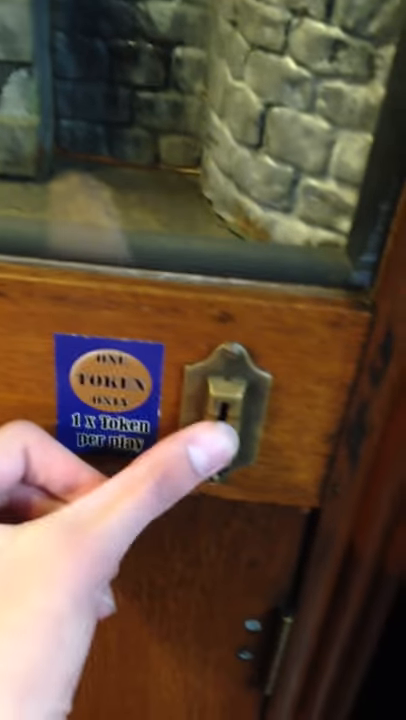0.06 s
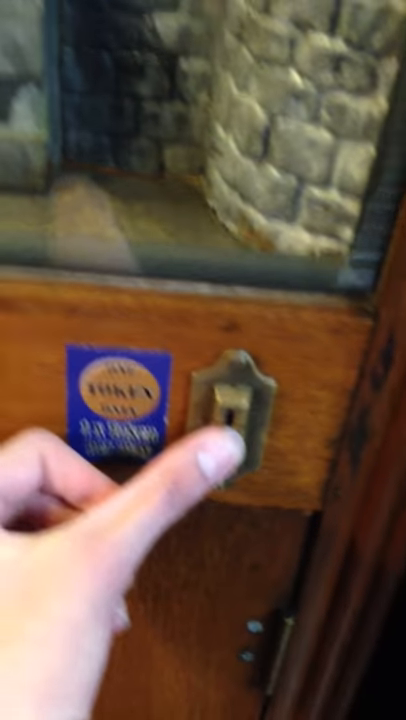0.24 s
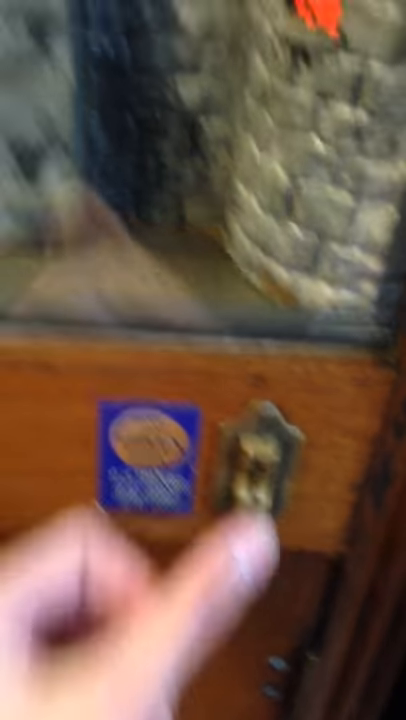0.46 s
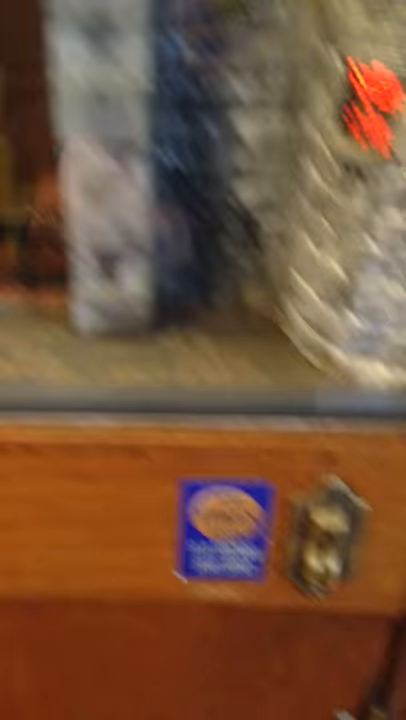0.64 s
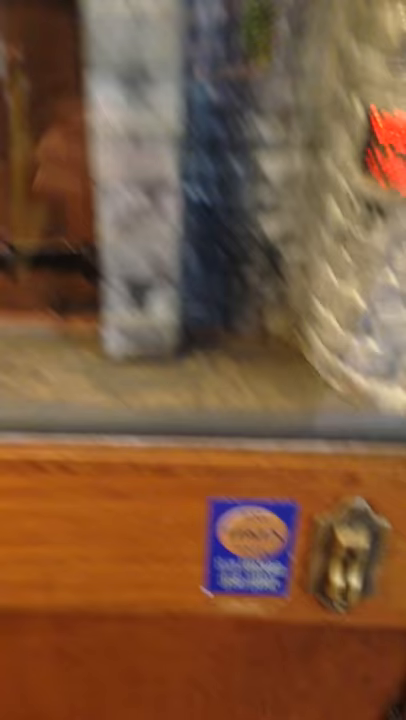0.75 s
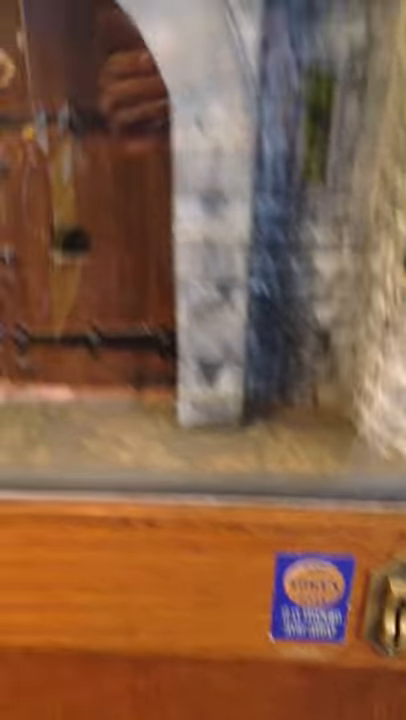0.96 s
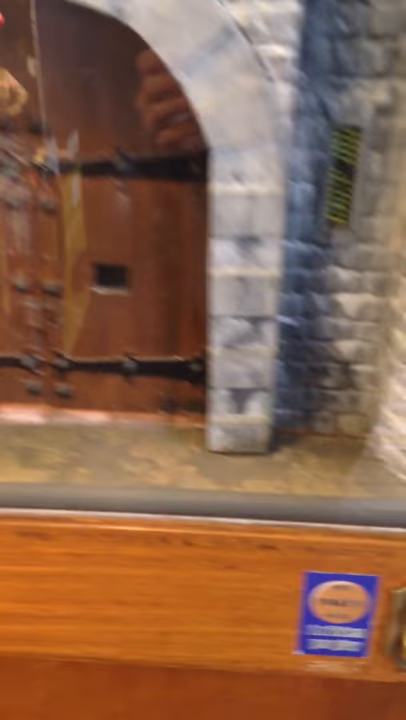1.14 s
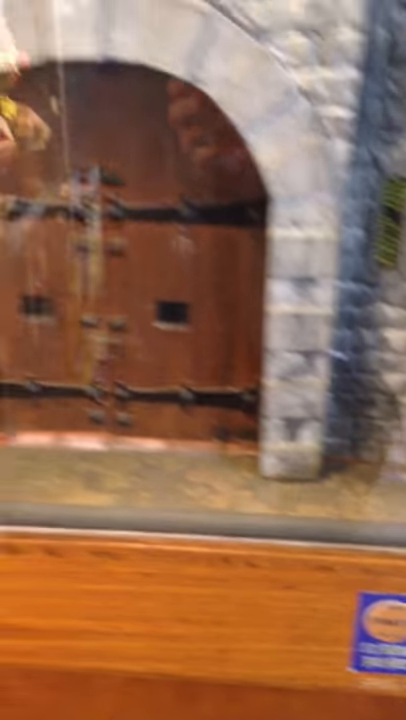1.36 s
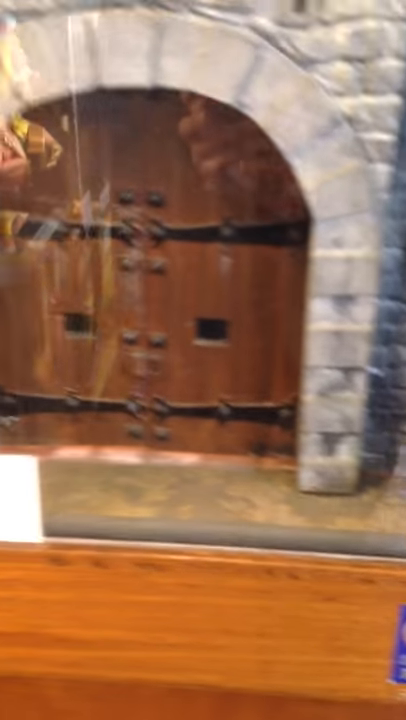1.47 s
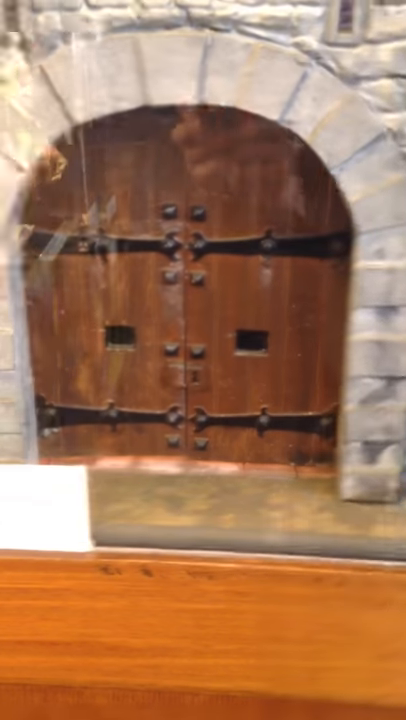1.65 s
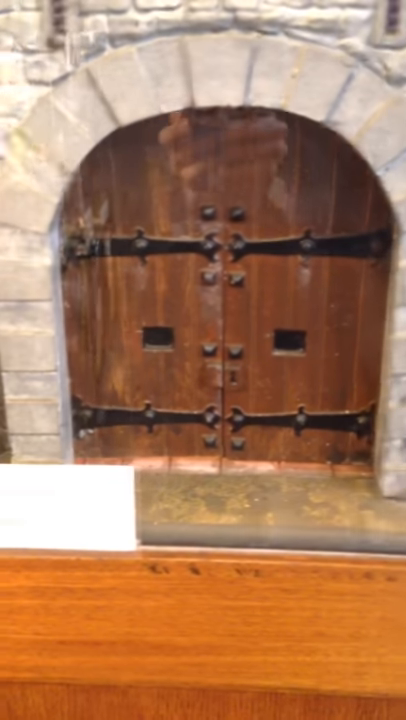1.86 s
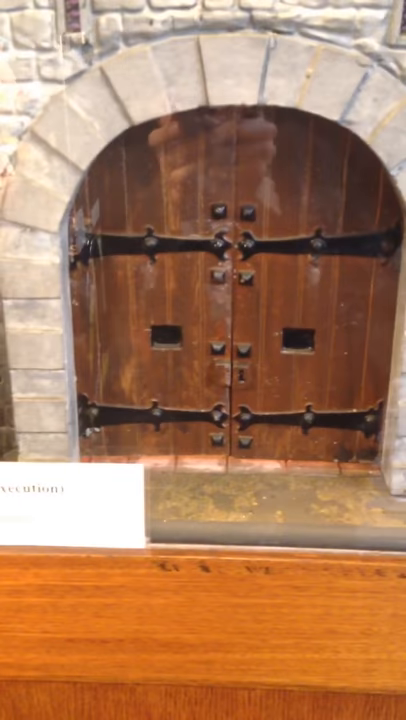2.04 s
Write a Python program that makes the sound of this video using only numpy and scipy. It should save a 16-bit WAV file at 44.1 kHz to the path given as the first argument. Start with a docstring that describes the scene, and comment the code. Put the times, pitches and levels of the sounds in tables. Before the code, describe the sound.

Close up indoors, quick metallic clicks of a token in a slot end in a loud clunk; an electric hum jumps in, a little motor spins up with faint gear whines, cloth rustles softly and a relay ticks.

```python
"""Over faint room tone, a metal token rattles and scrapes down the chute of a wooden coin-operated cabinet.
Soft knocks thud beneath; the token trips the latch and lands with a clunk. Hits are decaying modes and noise.
Mains hum, a wavering tone with overtones, lurches in; a small motor runs up, with gear whines and whir.
Clothing, as coloured noise, rustles near the microphone; a relay ticks once; a gear rasp fades in."""
import sys
import numpy as np
from scipy import signal
from scipy.io import wavfile
from scipy.ndimage import uniform_filter1d

SR = 44100
rng = np.random.default_rng(int(sys.argv[2]) if len(sys.argv) > 2 else 0)


def wav_out(sig):
    """Save sig, one row per channel (or a flat mono array), as 16-bit PCM at SR to the path in sys.argv[1]."""
    wavfile.write(sys.argv[1], SR, np.round(np.clip(np.atleast_2d(sig).T, -1, 1) * 32767).astype(np.int16))


def field_ratio(decibels):
    """Amplitude ratio for a level in dB (20 dB per decade); scalars and array-likes work."""
    return 10 ** (np.asarray(decibels, dtype=float) / 20)


N = 92610
T = np.arange(N) / SR

# whir spectrum: freq_hz, density_db (dB per Hz, relative)
WHIR_COLOUR = [(25, -1), (50, -33), (75, 9), (110, -5), (160, -1.5), (250, -10), (400, -7), (600, -11),
               (750, -3), (900, -10), (1200, -9.5), (2000, -17), (4000, -24.5), (8000, -30.5), (15500, -48)]
# token strikes on the chute: start_s, level_db, struck_mode_hz, lower_tone_db, upper_tone_db, rattle_decay_s
TOKEN_TAPS = [(.0005, -38, 4440, -57, -41, 0.0032), (.007, -25.5, 7600, -39, -46, 0.0028),
              (0.055, -23, 1500, -65, -64.5, 0.003), (0.072, -37.5, 3330, -73, -57, 0.011),
              (0.1225, -32, 3430, -39.5, -51.5, 0.0054), (0.1317, -22.5, 3410, -41.5, -55, 0.003),
              (0.144, -26, 1500, -49, -66, 0.0073), (0.1615, -28, 7600, -58, -61, 0.004),
              (.165, -25, 3430, -52.5, -64, 0.0039), (0.171, -31, 3410, -30.5, -70, 0.0088),
              (0.181, -32, 4400, -42, -70, 0.011), (0.185, -21, 1500, -72, -70, 0.005),
              (0.1962, -21.5, 4230, -54, -60, 0.012), (0.204, -30, 11260, -79, -57, 0.015),
              (0.219, -41.5, 5830, -65, -56, .008), (0.247, -31, 14660, -55, -60, 0.003),
              (0.267, -60, 3410, -35.5, -75, 0.063), (0.318, -65, 3410, -67, -80, .01)]
# token tones: freq_hz, t60_s
TOKEN_TONES = [(9895, 0.13), (12610, 0.26)]
# chute wall modes: freq_hz, level_db, t60_s
CHUTE_MODES = [(1500, -3, 0.028), (3410, 3, 0.016), (4400, 3, 0.016), (5830, -10, .015), (7600, -2, 0.015),
               (11260, -10, 0.01), (15000, -8, 0.01)]
# contact scratch spectrum: freq_hz, density_db (dB per Hz, relative)
SCRATCH_COLOUR = [(180, -43), (300, -9), (1120, -6.5), (2790, -8.5), (4300, -7.5), (6520, -9.5),
                  (14700, -3.5), (16000, -29)]
# token scraping along the chute: time_s, level_db
SLIDE_LEVEL = [(0, -32), (.03, -39.5), (.06, -42.5), (.1, -46), (.118, -51), (.13, -40.5), (.16, -40),
               (.19, -52), (.21, -41), (.23, -40), (.26, -67)]
# soft knocks on the cabinet: start_s, level_db
SOFT_KNOCKS = [(.001, -35.5), (.012, -38), (0.026, -46), (.055, -45), (.08, -46.5), (0.126, -49.5),
               (.16, -51), (0.201, -35), (.778, -48.5), (.8, -43), (0.841, -52)]
# blows on the cabinet: start_s, level_db, brightness_db_per_octave
CABINET_BLOWS = [(.198, -29.5, 0), (0.2309, -13, 5), (.2345, -29.5, 9.5), (.238, -19, 0), (.244, -26, -2),
                 (0.25, -25, -7.5), (.2575, -19, 5.5), (.265, -33, -9.5), (.276, -27.5, -6.5),
                 (.284, -45, -4.5), (0.296, -32.5, -6), (.313, -35, -4.5)]
# wooden panel modes: freq_hz, level_db, t60_s
PANEL_MODES = [(151.5, -12, 0.13), (285, -11, 0.1), (490, -5, 0.15), (640, -4, 0.1), (754, -6, 0.2),
               (802, -9, 0.2), (996, -5, 0.1), (1176, 0, 0.063), (1474, -1, 0.035), (1664, -4, 0.04),
               (1842, -7, 0.04), (1972, -5, 0.04), (2078, -4, 0.05), (2130, -6, .06), (2710, -4, 0.03),
               (3300, -4, 0.035)]
# crack spectrum: freq_hz, density_db (dB per Hz, relative)
CRACK_COLOUR = [(150, -36), (250, -17), (500, -7), (700, -4), (1250, -6), (1750, -5), (2090, 0),
                (2600, -10), (3370, -9), (4200, -20), (6500, -21), (9000, -31), (15000, -42)]
# room decay: freq_hz, t60_s
ROOM_DECAY = [(100, 0.83), (400, 1), (1000, 0.48), (2100, 0.76), (3500, 0.56), (5000, 0.44), (8000, 0.39),
              (14000, 0.29)]
# hum fundamental: time_s, level_db
HUM_LEVEL = [(.2, -67), (.23, -45), (.255, -37.5), (.275, -34), (.298, -50), (.325, -40), (0.346, -33.5),
             (.37, -40.5), (.41, -41.5), (0.598, -44), (.8, -44), (1.2, -46), (1.7, -45), (2.1, -44.5)]
# hum overtones: multiple, level_db (once running)
OVERTONES = [(2, -57.5), (3, -60), (5, -67), (7, -67)]
# motor tones: time_s, level_db
MOTOR_LEVEL = [(.3, -70), (.62, -66), (.74, -55), (1.2, -56.5), (2.1, -56)]
# shaft orders: multiple_of_shaft, level_db, waver_db
SHAFT_ORDERS = [(9.87, -10, 2.5), (12, 0, 1.2), (13, -5, 2), (14, -10, 4), (15, -10, 4), (16, -12, 4)]
# gear whines: start_s, end_s, first_hz, last_hz, level_db
GEAR_WHINES = [(.33, .58, 385, 430, -61), (.38, .87, 695, 705, -58), (.45, .72, 610, 660, -61),
               (1.05, 1.25, 715, 725, -60), (1.15, 1.52, 760, 800, -62), (1.62, 2.2, 1030, 1034, -62),
               (1.85, 2.2, 1200, 1203, -68)]
# rustle: time_s, level_db
RUSTLE_LEVEL = [(.35, -85), (.47, -72), (.56, -63), (0.66, -57), (0.745, -58.5), (.8, -63), (.95, -65),
                (1.1, -69), (1.28, -75), (1.47, -68), (1.56, -75), (1.82, -70), (2.1, -77)]
# cloth spectrum: freq_hz, density_db (dB per Hz, relative)
CLOTH_COLOUR = [(1470, -39), (2500, 4), (2850, 8.5), (14200, 9.5), (15600, 4), (16000, -35)]
# gear rasp spectrum: freq_hz, density_db (dB per Hz, relative)
RASP_COLOUR = [(800, -30), (1050, 12), (1300, 4), (1500, -15), (1750, 4), (2100, -18), (3200, -7),
               (4500, -37)]

MOTOR_ON_S, SPIN_UP_S = 0.3, 0.15


def unit_rms(x):
    """Scales to rms 1."""
    return x / np.sqrt(np.mean(x ** 2) + 1e-20)


def read(points, hz):
    """Reads a table on a log-frequency axis."""
    f, value = np.transpose(points)
    return np.interp(np.log(hz + 1), np.log(f + 1), value)


def add(mix, start_s, sound):
    """Mixes a sound in at start_s."""
    part = mix[max(round(start_s * SR), 0):][:len(sound)]
    part += sound[:len(part)]


def butter(x, order, hz, kind="low"):
    """Butterworth filter."""
    return signal.sosfilt(signal.butter(order, hz, kind, fs=SR, output="sos"), x)


def noise(colour, patchy_db):
    """Coloured noise with drifting patches, rms 1."""
    hz = np.fft.rfftfreq(1024, 1 / SR)
    real, imag, patches = rng.standard_normal((N // 256 + 5, 513, 3)).T
    patches = uniform_filter1d(patches, 10, axis=0)
    patches = unit_rms(uniform_filter1d(patches, 10, axis=1))
    z = (real + 1j * imag) * field_ratio(read(colour, hz)[:, None] + patchy_db * patches)
    return unit_rms(signal.istft(z, nperseg=1024, noverlap=768)[1][:N])


def wander(fastest_hz, slowest_hz=0.5):
    """Slow chance, rms 1: sines of random phase, weaker with frequency."""
    rates_hz = np.geomspace(slowest_hz, fastest_hz, num=20)
    return unit_rms(sum(np.sin(2 * np.pi * (f * T + rng.random())) / np.sqrt(f) for f in rates_hz))


def ring(modes, tilt_db_per_octave, scatter_db, rise_s):
    """One blow into a set of decaying modes, each struck with a different share."""
    t = T[:SR // 3, None]
    hz, db, t60_s = np.transpose(modes)
    luck = rng.standard_normal((len(modes), 2))
    tilt_db = tilt_db_per_octave * np.log2(hz / 1000)
    level = field_ratio(db + tilt_db + scatter_db * luck[:, 0] - 60 * t / t60_s)
    tones = level * np.sin(2 * np.pi * hz * t + luck[:, 1])
    return tones.sum(1) * (1 - np.exp(-t[:, 0] / rise_s))


def switched_on():
    """Ramp from 0 to 1 as the motor is switched on."""
    return np.clip((T - MOTOR_ON_S) / SPIN_UP_S, 0, 1)


def shaft_turn():
    """Shaft angle in radians: from switch-on, speed closes exponentially on full speed."""
    full_per_s, lag_per_s, run_up_s = 47.62, 7, 0.3
    speed = full_per_s - lag_per_s * np.exp(-np.maximum(T - MOTOR_ON_S, 0) / run_up_s)
    return 2 * np.pi * np.cumsum(speed * (1 + 0.0016 * wander(11.8))) / SR


def whir(turn):
    """Coloured noise: room tone before the switch, then louder under strain, throbbing once a turn."""
    running_db, idle_db, strain_db, strain_s, throb_depth = -54, -3, 4, 0.59, 0.18
    on = switched_on()
    labour_db = strain_db * on * np.exp(-((T - MOTOR_ON_S) / strain_s) ** 2)
    level_db = running_db + idle_db * (1 - on) + labour_db + 1.37 * wander(8.78)
    throb = 1 + throb_depth * on * np.cos(turn)
    return field_ratio(level_db) * throb * noise(WHIR_COLOUR, patchy_db=-0.67)


def slide(scratch):
    """The token scrapes along the chute: dull noise of fluttering level."""
    time_s, db = np.transpose(SLIDE_LEVEL)
    level = field_ratio(np.interp(T, time_s, db, right=-99) + 2.2 * wander(151, 14.7))
    return level * butter(scratch[::-1], 2, 5150)


def token():
    """Each tap is a scratchy rattle that rings the chute, and the token until a new touch stifles it."""
    scratch_db, top_hz, dull_ratio = -6, 15700, 2.4
    focus_db_per_octave, stifle_s = -8, 0.0058
    twin_hz, twin_db = 65, -10
    out, t = np.zeros(N), T[:SR // 3]
    scratch = noise(SCRATCH_COLOUR, patchy_db=1.5)
    for tap, after in zip(TOKEN_TAPS, TOKEN_TAPS[1:] + [[N / SR]]):
        start_s, level_db, struck_hz, *tones_db, decay_s = tap
        rattle = np.roll(scratch, -round(start_s * SR))[:len(t)]
        rattle = butter(rattle, 2, min(dull_ratio * struck_hz, top_hz))
        rattle = rattle * np.minimum(t / 0.0015, 1) * np.exp(-t / decay_s)
        # modes far from the struck one ring less
        walls = [(hz, db + focus_db_per_octave * abs(np.log2(hz / struck_hz)), t60_s)
                 for hz, db, t60_s in CHUTE_MODES]
        chute = 0.55 * ring(walls, 0, scatter_db=2, rise_s=0.002)
        modes = [(hz, db, t60_s) for (hz, t60_s), db in zip(TOKEN_TONES, tones_db)]
        # a weaker twin just above each tone makes the ring flutter
        modes += [(hz + twin_hz, db + twin_db, t60_s) for hz, db, t60_s in modes]
        free = np.exp(-np.maximum(t + start_s - after[0], 0) / stifle_s)
        tones = free * ring(modes, 0, scatter_db=3.0, rise_s=decay_s / 3)
        add(out, start_s, field_ratio(level_db) * (field_ratio(scratch_db) * rattle + chute) + tones)
    return out + slide(scratch)


def knocks():
    """Soft contacts shorten the ring and reach only the lowest panel modes."""
    out, t60_ratio = np.zeros(N), 0.55
    modes = np.multiply(PANEL_MODES[:4], [1, 1, t60_ratio])
    for start_s, level_db in SOFT_KNOCKS:
        add(out, start_s, field_ratio(level_db) * ring(modes, -5, scatter_db=2.5, rise_s=0.003))
    return out


def room(x):
    """Sparse taps of random sign, each band dying at its own speed."""
    taps = np.zeros(SR)
    at = np.arange(300, SR - 20, 20)
    taps[at + rng.integers(0, 20, len(at))] = rng.choice([-1., 1.], len(at))
    hz, t, z = signal.stft(taps, SR, nperseg=256)
    decay = field_ratio(-60 * t / read(ROOM_DECAY, hz)[:, None])
    tail = signal.istft(z * decay, SR, nperseg=256)[1]
    return signal.fftconvolve(x, tail / np.linalg.norm(tail))[:N]


def blows():
    """Each blow cracks and rings the wooden panels; the crack's treble dies first."""
    body_hz, snap_hz, crack_t60_s, snap_t60_s = 950, 4000, 0.046, 0.022
    out, t = np.zeros(N), T[:SR // 3]
    crack = noise(CRACK_COLOUR, patchy_db=2)
    snap = butter(crack, 2, snap_hz, "high")
    body = butter(crack, 2, body_hz)
    bands = body, crack - snap - body, snap
    for start_s, level_db, tilt_db in CABINET_BLOWS:
        low, mid, high = (np.roll(x, -round(start_s * SR))[:len(t)] for x in bands)
        # bright blows hold less body and more snap
        burst = (low * field_ratio(-1.2 * tilt_db) + mid) * field_ratio(-60 * t / crack_t60_s)
        burst = burst + high * field_ratio(1.9 * tilt_db - 3 - 60 * t / snap_t60_s)
        burst = burst * np.minimum(t / 0.0005, 1)
        panels = 0.22 * ring(PANEL_MODES, tilt_db, scatter_db=2, rise_s=0.0008)
        add(out, start_s, field_ratio(level_db) * (burst + panels))
    return out


def hum():
    """Mains hum of the coil lurches at switch-on; its overtones come in as the motor takes load."""
    time_s, db = np.transpose(HUM_LEVEL)
    phase = 2 * np.pi * np.cumsum(100.3 + 0.25 * wander(8)) / SR
    overtones = sum(field_ratio(level_db + 2.5 * wander(20, 2)) * np.sin(k * phase + k) for k, level_db in OVERTONES)
    fundamental = field_ratio(np.interp(T, time_s, db, left=-90)) * np.sin(phase)
    return np.sqrt(2) * (fundamental + switched_on() * overtones)


def motor(turn):
    """Tones at multiples of the shaft speed climb with it, each wavering in level."""
    time_s, db = np.transpose(MOTOR_LEVEL)
    orders = sum(field_ratio(level_db + waver_db * wander(40, 4)) * np.sin(k * turn + 6 * rng.random())
                 for k, level_db, waver_db in SHAFT_ORDERS)
    return np.sqrt(2) * switched_on() * field_ratio(np.interp(T, time_s, db)) * orders


def gear_whines():
    """Gears whine as they engage: gliding tones, unsteady in pitch and level."""
    out = np.zeros(N)
    for start_s, end_s, first_hz, last_hz, level_db in GEAR_WHINES:
        hz = np.interp(T, [start_s, end_s], [first_hz, last_hz])
        gate = np.clip(np.minimum(T - start_s, end_s - T) / 0.051, 0, 1)
        level = np.sqrt(2) * gate * field_ratio(level_db + 3 * wander(40, 4))
        out += level * np.sin(2 * np.pi * np.cumsum(hz + 9 * wander(40, 3)) / SR)
    return out


def rustle():
    """Cloth and skin hiss as the hand draws back: coloured noise."""
    time_s, db = np.transpose(RUSTLE_LEVEL)
    level = field_ratio(np.interp(T, time_s, db, left=-90) + 0.7 * wander(40))
    return level * noise(CLOTH_COLOUR, patchy_db=2)


def relay_tick():
    """A relay ticks: one dry snap of decaying band-passed noise."""
    start_s, level_db, t60_s, band_hz = 0.7743, -41, 0.016, (1200, 5500)
    out, t = np.zeros(N), T[:SR // 20]
    snap = butter(rng.standard_normal(len(t)), 2, band_hz, "band")
    add(out, start_s, field_ratio(level_db - 60 * t / t60_s) * unit_rms(snap))
    return out


def gear_rasp():
    """Gear rasp: coloured noise fading in."""
    level_db, fade_s = -62, (0.78, 1.78)
    return field_ratio(level_db) * np.interp(T, fade_s, [0, 1]) * noise(RASP_COLOUR, patchy_db=2.5)


def scene():
    """Token, cabinet and tick in the room, over the running mechanism and the rustle."""
    room_db = -13.5
    turn = shaft_turn()
    hits = token() + knocks() + blows() + relay_tick()
    mechanism = whir(turn) + hum() + motor(turn) + gear_whines() + gear_rasp()
    return (hits + field_ratio(room_db) * room(hits) + mechanism + rustle())[None]


def roll_off(x):
    """The treble ends steeply here."""
    return signal.sosfilt(signal.butter(12, 16370, fs=SR, output="sos"), x)


def record(dry):
    """The microphone's low cut, then the band limit."""
    low_cut_hz, edge_hz = 45, 15700
    mix = butter(dry, 3, low_cut_hz, "high")
    band_limit = signal.firwin(511, edge_hz, window=("kaiser", 9), fs=SR)
    mix = signal.oaconvolve(mix, band_limit[None], "same")
    return roll_off(mix)


dry = scene()
out = record(dry)
wav_out(out)
```